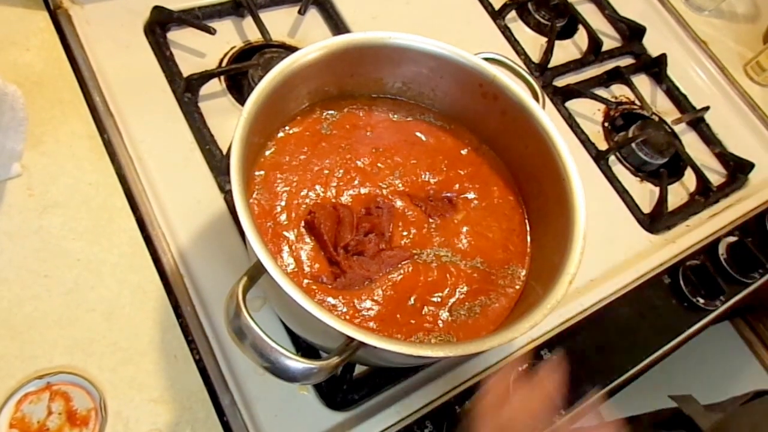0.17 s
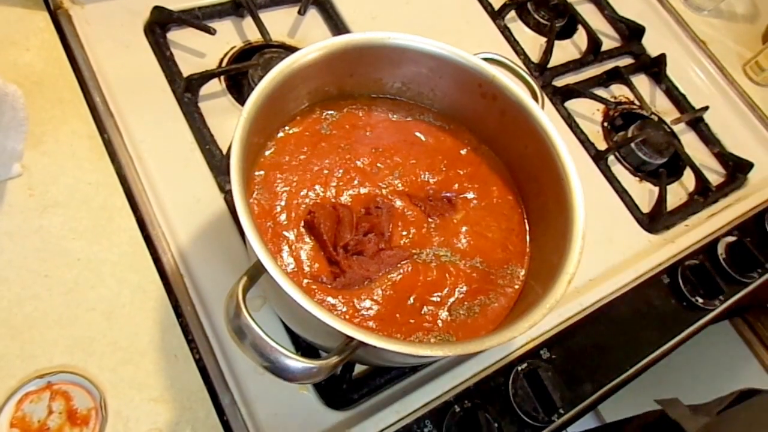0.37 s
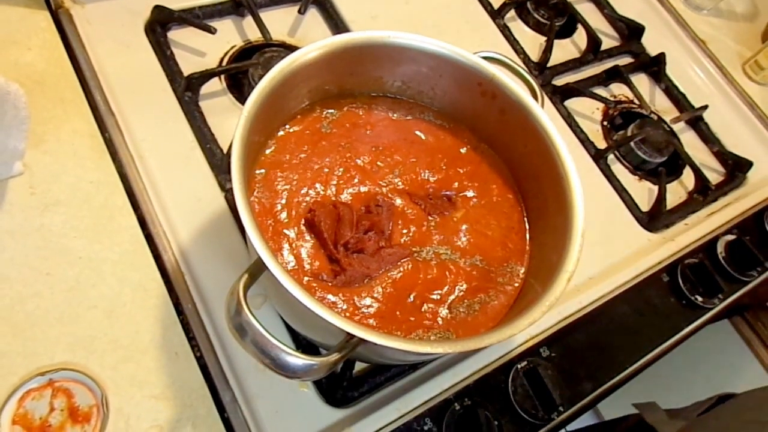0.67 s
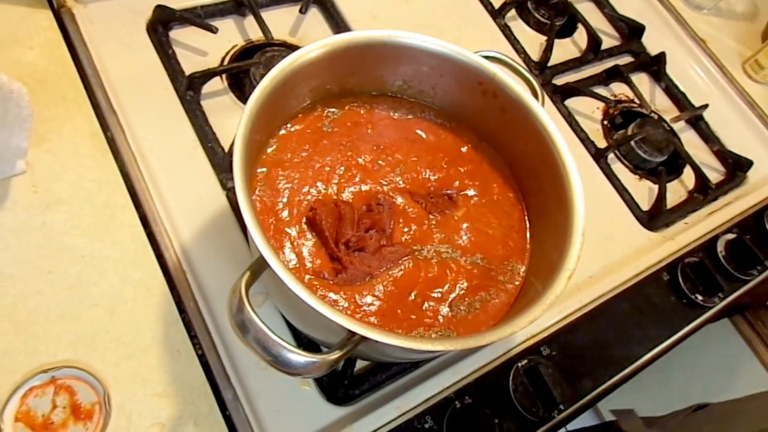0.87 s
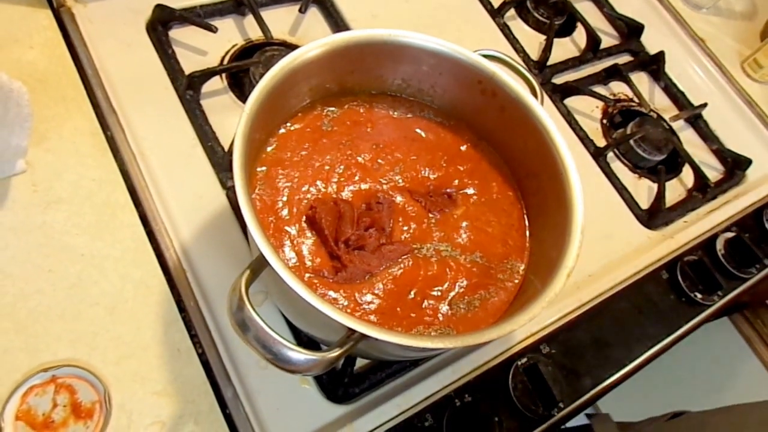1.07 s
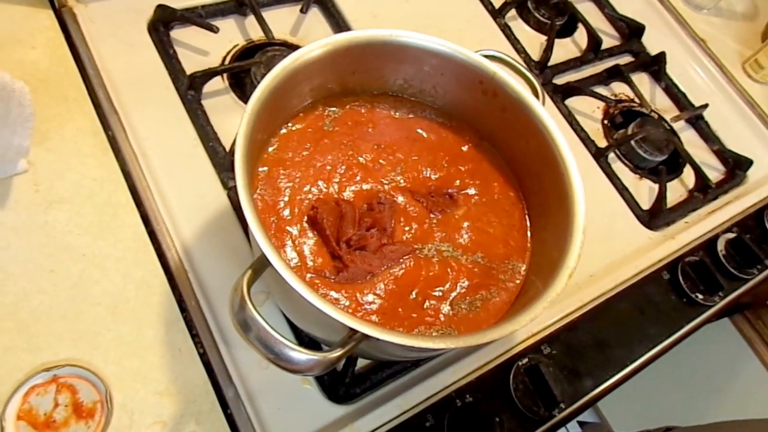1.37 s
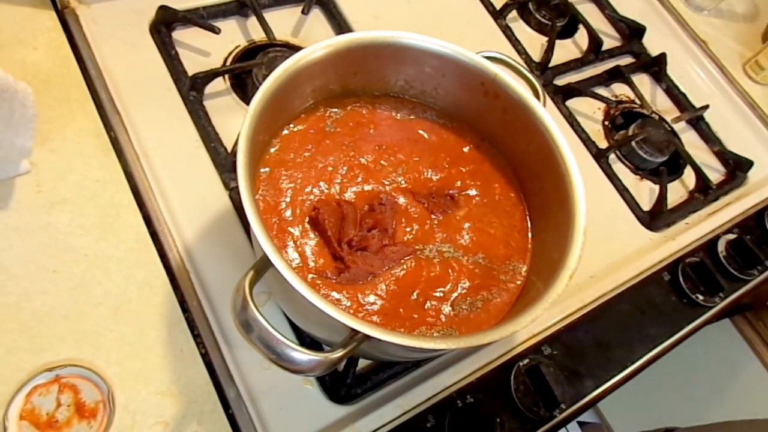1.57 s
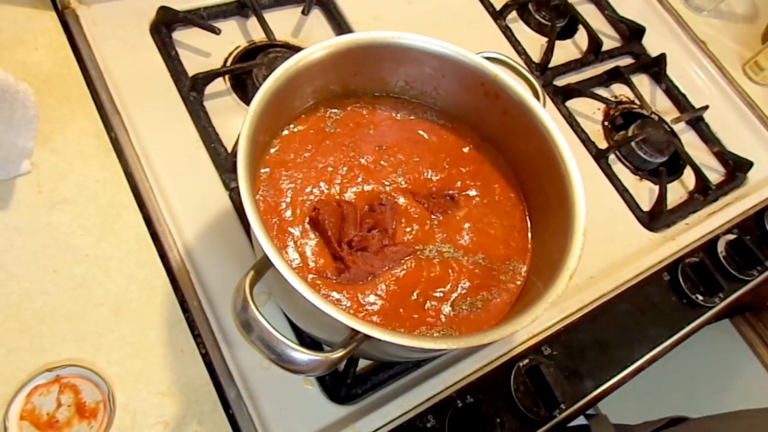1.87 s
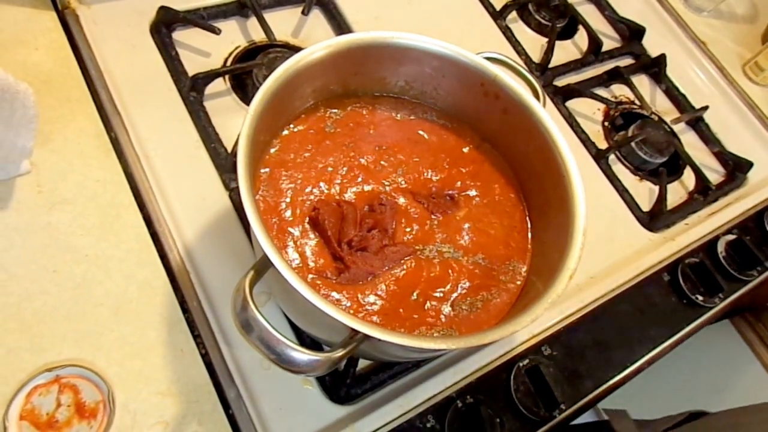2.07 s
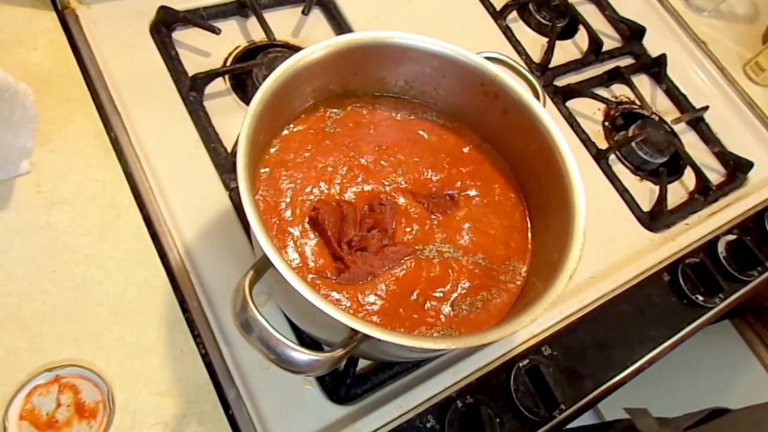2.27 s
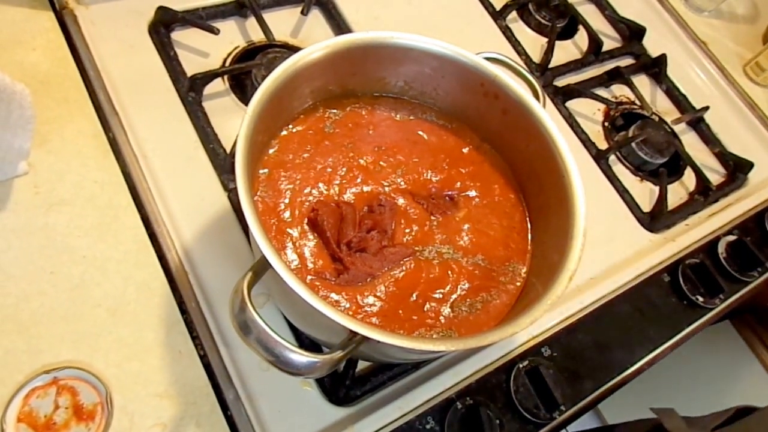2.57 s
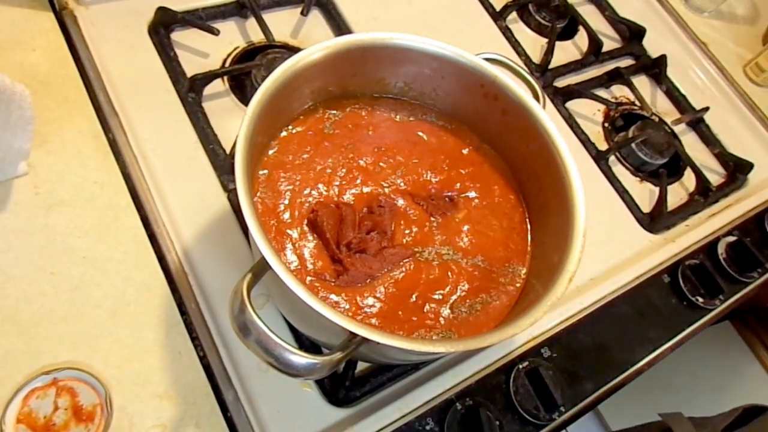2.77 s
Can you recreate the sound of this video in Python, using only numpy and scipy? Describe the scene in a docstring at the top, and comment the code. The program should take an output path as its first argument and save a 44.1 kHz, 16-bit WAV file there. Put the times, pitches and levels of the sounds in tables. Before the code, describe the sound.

A metal knife clinks and scrapes inside a tin can, with one hard clank.

```python
"""A steel knife works the last paste out of a tin can over a stove. First the hollow can goes clonk.
Then the blade clinks and chatters on the thin wall, knocks dully where paste cushions it and slides
lightly between blows. Halfway through, it scrapes harder along the inside. Near the end comes one hard
clank with a rebound; a pot's low notes hum on under two last soft knocks. All along, a small kitchen
echoes and hisses faintly. The sound sits in the centre."""
import sys
import numpy as np
from scipy import signal
from scipy.fft import rfft, irfft
from scipy.io import wavfile

SR = 44100
rng = np.random.default_rng(int(sys.argv[2]) if len(sys.argv) > 2 else 0)


def master_out(mix):
    """Clip the mix to full scale and print it as 16-bit PCM to the path in sys.argv[1]."""
    frames = np.transpose(np.atleast_2d(mix))
    ceiling = np.clip(frames, -1, 1)
    pcm = np.round(ceiling * 32767).astype(np.int16)
    wavfile.write(sys.argv[1], SR, pcm)


N = 130095
T = np.arange(SR * 4 // 5) / SR  # seconds since a blow began
ROOM_DB, RING_ROOM_DB = -10.5, -17  # echo level of noisy sounds, and of ringing metal


def clinks(wall_db=10, snap_db=3, can_db=-5.5, stove_delay_s=0.0072, stove_db=-7.5):
    """The blade snaps and chatters on the tin; wall, blade, can and struck spot all ring."""
    # blows on the wall: start_s, contact_s, low_db, mid_db, high_db, top_db, blade_db, spot_hz, spot_db
    blows = [(0.22, 0.0037, -33, -41.5, -32.5, -57, -57, 542, -36),
             (.270, 0.0055, -25.5, -27.5, -16, -30, -25, 6526, -28.5),
             (0.3228, 0.0057, -27, -27, -23.5, -33, -34.5, 4080, -32),
             (0.703, 0.0074, -29, -27, -19, -25.5, -50, 1260, -52),
             (0.715, 0.0051, -36, -38, -36, -26.5, -60, 3820, -24),
             (0.923, 0.013, -55, -43.5, -38, -47, -53, 625, -43),
             (.943, 0.025, -38, -38.5, -37, -36, -42.5, 3700, -40.5),
             (1.096, 0.022, -24.5, -22, -22.5, -37, -25.5, 2874, -20),
             (1.1085, 0.0068, -20.5, -35, -17.5, -18, -21.5, 778, -28),
             (1.1814, 0.0083, -30, -33.5, -30.5, -26.5, -45, 764, -29.5),
             (1.451, 0.014, -34, -31.5, -30, -29, -39, 3825, -35),
             (1.72, 0.015, -56, -39, -39, -43, -48, 3230, -63),
             (1.946, 0.0082, -34.5, -32.5, -25, -32.5, -59, 2540, -25.5),
             (1.965, 0.0057, -37.5, -38.5, -48, -62, -56, 2410, -33.5),
             (2.172, .011, -27, -23, -18.5, -26.5, -25.5, 742, -23.5),
             (2.236, 0.0064, -25, -24, -10, -36, -30, 2317, -19.5),
             (2.256, 0.019, -30.5, -28.5, -27.5, -27.5, -47, 2400, -24),
             (2.283, 0.03, -41, -33, -29.5, -68, -52, 3000, -28),
             (2.372, 0.015, -32.5, -31, -27, -29.5, -35, 720, -30.5),
             (2.4241, 0.011, -24.5, -32, -25.5, -61, -48, 2970, -29),
             (2.487, .009, -33, -31, -31, -25.5, -33, 526, -30)]
    # middles of the low, mid, high and top bands: pitch_hz
    bands_hz = [620, 1500, 3700, 10500]
    # tone colours of the thin wall and of the bright first snap: pitch_hz, level_db
    tin_colour = [(30, -65), (110, -28), (220, -13.5), (380, -6), (650, -2), (1000, -5), (1500, 0.5),
                  (3000, -8.5), (4700, -7.5), (5600, -11.5), (7600, -14.5), (11500, -18), (15000, -33)]
    snap_colour = [(200, -8), (3000, -23), (6000, -9.5), (11500, 4), (15000, 7)]
    # ringing notes of the blade and of the can: pitch_hz, level_db, fade_s
    blade_notes = [(2876, -3.5, 0.18), (3584, -9.5, .085), (4260, -9, 0.087), (4610, -3, .11),
                   (4690, -3, 0.11), (6610, -10, 0.11), (8620, -18, 0.14), (8920, -17, .1),
                   (10870, -9.5, 0.087), (11640, -6, 0.04), (13200, -11, 0.049), (13300, -10, 0.13),
                   (14790, -23, 0.062)]
    can_notes = [(548, -5.5, 0.18), (742.3, -0.5, 0.11), (1350, -11, 0.12), (1721, -4, 0.093),
                 (1920, -11.5, 0.071), (2463, -11, 0.13), (3030, -4, 0.088), (3210, -2.5, 0.054),
                 (3915, -2, 0.03), (3915, -4.5, 0.11), (4700, -12.5, 0.031), (6140, -7, 0.035),
                 (8910, -7.5, 0.063), (11380, -12.5, 0.13)]
    out = np.zeros(N)
    for start_s, contact_s, low_db, mid_db, high_db, top_db, blade_db, spot_hz, spot_db in blows:
        bands = list(zip(bands_hz, (low_db, mid_db, high_db, top_db)))
        peaks = wall_peaks()
        taps = chatter(contact_s, fade_s=0.074)
        wall = coloured(taps, lambda hz: along(tin_colour, hz) + along(bands, hz) + peaks(hz) + wall_db)
        snap = amp(top_db + snap_db) * coloured(chatter(0, fade_s=0.042), shape(snap_colour))
        tones = amp(blade_db) * ring(blade_notes, waver=0.81)
        tones += amp(mid_db + can_db) * ring(can_notes, waver=0.48)
        tones += ring([(spot_hz, spot_db, 0.093)], waver=1.37)
        room = echo(amp(ROOM_DB) * wall + amp(RING_ROOM_DB) * tones)
        add(out, start_s, snap + wall + tones + room)
        # the stove top throws each clink back
        add(out, start_s + stove_delay_s, amp(stove_db) * (snap + kitchen(wall)))
    return out


def clank():
    """A heavy metal blow and its rebound, each with a rough ring that dies quickly."""
    # the two blows: start_s, contact_s, body_db, ring_db
    blows = [(2.593, 0.0078, -14, -25), (2.639, 0.019, -30, -71)]
    # tone colour of the crash: pitch_hz, level_db
    body_colour = [(30, -32), (110, -20.5), (170, -23), (250, -9), (350, -5.5), (700, 2), (1300, 0),
                   (1900, 0.5), (2600, -10), (3300, -7.5), (3950, -20), (4500, -4), (5400, -25.5),
                   (7300, -33), (15000, -36)]
    # high notes of the metal: pitch_hz, level_db, fade_s
    notes = [(4500, -10, .14), (4656, 3, 0.07), (4834, -17, .13), (5950, 2.5, 0.095), (6514, -18, .14),
             (8064, -15, 0.19), (8796, -17, 0.12), (11500, -17, 0.1), (14200, -28, .1)]
    out = np.zeros(N)
    for start_s, contact_s, body_db, ring_db in blows:
        peaks, colour = wall_peaks(), shape(body_colour)
        body = coloured(chatter(contact_s, fade_s=0.12), lambda hz: colour(hz) + 0.5 * peaks(hz))
        tones = amp(ring_db) * ring(notes, waver=1.26)
        add(out, start_s, kitchen(amp(body_db) * body) + tones + amp(RING_ROOM_DB) * echo(tones))
    return out


def clonk(start_s=0.2388, level_db=-10.5, rise_s=0.0021):
    """One clean, short blow into the hollow of the can: all its notes start together."""
    # notes of the hollow can: pitch_hz, level_db, fade_s
    notes = [(714, -28, 0.016), (830, -3, 0.05), (886.5, 4.5, 0.066), (955, -6, 0.12), (1296, -4, 0.1),
             (1394, -6, 0.12), (1990, -9, .04), (2510, -9, 0.018)]
    tones = sum(amp(db) * fade(T, fade_s) * np.sin(2 * np.pi * hz * T) for hz, db, fade_s in notes)
    out = np.zeros(N)
    add(out, start_s, amp(level_db) * tones * (1 - np.exp(-T / rise_s)))
    return out


def knocks(contact_s=0.003, fade_s=0.072, width_octaves=0.49):
    """Paste cushions these blows, leaving a hollow thud with a brighter edge."""
    # cushioned blows: start_s, level_db, pitch_hz, edge_db (compared with the thud)
    blows = [(.2395, -16, 938, 0), (0.253, -39, 1220, -16), (.265, -23, 1130, -13), (.394, -27, 910, -10),
             (.4215, -32.5, 1020, -22), (.435, -33, 880, -0.5), (.4545, -23, 903, -8.5),
             (.565, -44.5, 600, 0), (1.033, -32.5, 610, -43), (1.074, -34, 495, -16),
             (1.203, -33, 530, -13), (1.395, -48.5, 368, -11), (1.514, -36, 630, -27),
             (1.623, -32.5, 606, -11), (1.863, -27.5, 670, -10), (1.879, -39.5, 427, -25),
             (2.109, -55, 720, 11), (2.820, -35, 750, -27), (2.882, -41.5, 670, -10)]
    # tone colours of the thud's bass and of the edge: pitch_hz, level_db
    bass_colour = [(60, -10), (170, 9), (300, -4), (450, 0.5)]
    edge_colour = [(50, -64), (300, -26.5), (900, 3.5), (1400, 10), (1700, 5.5), (2400, 8.5), (2800, -2.5),
                   (3800, -6.5), (5000, -11), (6500, -26), (15000, -30)]
    out = np.zeros(N)
    for start_s, level_db, pitch_hz, edge_db in blows:
        def hollow(hz):
            """One broad peak around the knock's pitch, in dB."""
            distance = np.log2((hz + 1) / pitch_hz) / width_octaves / 2
            return -20 * np.log10(1 + distance ** 2) * 2.73 + along(bass_colour, hz)
        thud = coloured(chatter(contact_s, fade_s), same_power(hollow))
        edge = coloured(chatter(contact_s, fade_s), shape(edge_colour))
        add(out, start_s, amp(level_db) * kitchen(thud + amp(edge_db) * edge))
    return out


def scrape(slips_per_s=900, spread_db=4):
    """Tiny uneven slips of the blade make a hollow rub, a rasp on the wall and a thin squeak."""
    # loudness of the scraping over time: time_s, rub_db, rasp_db, squeak_db
    loudness = [(.1, -64, -72, -82), (.84, -86, -68, -74), (1.02, -56, -66, -79), (1.25, -54, -62, -56),
                (1.40, -63.5, -62, -75), (1.50, -41.5, -46.5, -47.5), (1.56, -44, -50, -81),
                (1.61, -48, -50.5, -56), (1.636, -45, -42.5, -46), (1.70, -37.5, -42, -48.5),
                (1.745, -52.5, -52, -57), (1.81, -42.5, -52, -46.5), (1.846, -50, -49, -59),
                (1.902, -33.5, -52, -47), (1.95, -79, -46, -57), (2.14, -54.5, -68, -66),
                (2.45, -62, -48, -47.5), (2.95, -50, -69, -89)]
    # tone colours of the can's hollow and of its wall: pitch_hz, level_db
    rub_colour = [(100, -41.5), (280, -17.5), (400, -5), (540, -5), (610, -5.5), (690, 5), (790, -6),
                  (950, -19.5), (1400, -18.5), (4000, -86)]
    rasp_colour = [(200, -13), (1000, -0.5), (1600, 7.5), (2200, 2.5), (2700, -14), (4800, -10.5),
                   (6500, -20.5), (15000, -34)]
    # narrow peaks of the squeak: pitch_hz, width_hz, level_db
    squeaks = [(2857, 190, -1.5), (3252, 110, -1.5), (4900, 230, -14)]

    def squeak(hz):
        """The peaks added together, in dB."""
        peaks = (amp(db) / (1 + (2 * (hz - pitch) / width) ** 2) for pitch, width, db in squeaks)
        return 20 * np.log10(sum(peaks))
    times_s, *levels = np.transpose(loudness)
    out = np.zeros(N)
    for level_db, colour in zip(levels, (shape(rub_colour), shape(rasp_colour), same_power(squeak))):
        slips = (rng.random(N) < slips_per_s / SR) * rng.choice([-1, 1], N)
        slips = slips * amp(spread_db * rng.standard_normal(N))
        slips /= np.sqrt(np.mean(slips ** 2) + 1e-20)
        out += amp(np.interp(np.arange(N) / SR, times_s, level_db)) * coloured(slips, colour)
    return kitchen(out)


def hums():
    """Low metal notes hum on: the can after some harder blows, a pot after the last clank."""
    # lingering low notes: start_s, pitch_hz, level_db, fade_s
    notes = [(.239, 835, -32.5, 0.62), (0.24, 1400, -30.5, 0.3), (0.238, 1007, -46, 0.33),
             (0.7009, 1324, -38.5, 0.31), (1.946, 816, -44, 0.44), (2.592, 1321, -26, 0.36),
             (2.593, 1045, -32, 0.46), (2.593, 753, -37, 0.74)]
    out = np.zeros(N)
    for start_s, *note in notes:
        add(out, start_s, ring([note], waver=0.27))
    return out


def slides():
    """The blade slides lightly over the metal in soft swells of noise."""
    # strokes: middle_s, length_s, level_db, pitch_hz, fall_db (per octave away from the pitch)
    strokes = [(0.185, .025, -56.5, 4400, 5), (0.438, 0.016, -51.5, 10000, 10),
               (0.422, 0.068, -38, 950, 27), (0.622, 0.061, -60, 12500, 16),
               (0.896, 0.056, -54.5, 3780, 13), (0.906, 0.037, -58, 11000, 14),
               (1.632, .05, -57.5, 9000, 6), (1.88, .06, -58.5, 9000, 4)]
    out, t = np.zeros(N), np.arange(N) / SR
    for middle_s, length_s, level_db, pitch_hz, fall_db in strokes:
        colour = same_power(lambda hz: -fall_db * np.abs(np.log2((hz + 1) / pitch_hz)))
        swell = np.exp(-2 * ((t - middle_s) / length_s) ** 2)
        out += amp(level_db) * swell * coloured(rng.standard_normal(N), colour)
    return out


def kitchen(sound):
    """A sound together with its echo."""
    return sound + amp(ROOM_DB) * echo(sound)


def echo(sound, rise_s=0.0052):
    """The room answers with a noisy tail whose high pitches die first."""
    # how long the kitchen rings: pitch_hz, fade_s
    room_fades = [(150, 0.86), (700, 0.77), (2000, 0.39), (5000, 0.37), (12000, 0.3)]
    hz, t, noise = signal.stft(rng.standard_normal(SR * 3 // 4), SR, nperseg=256)
    tail = signal.istft(noise * fade(t, along(room_fades, hz)[:, None]), SR, nperseg=256)[1]
    tail *= 1 - np.exp(-T[:len(tail)] / rise_s)
    return signal.fftconvolve(sound, tail / np.linalg.norm(tail))[:len(sound)]


def hiss():
    """The steady background noise of stove and kitchen."""
    # tone colour of the hiss: pitch_hz, level_db
    hiss_colour = [(25, -11.5), (60, -6), (130, -4), (230, -3), (700, -8), (1150, 5), (1700, -7),
                   (3700, -6.5), (5600, -11), (14400, -12), (16000, -14.5)]
    return coloured(rng.standard_normal(N), shape(hiss_colour))


def chatter(contact_s, fade_s, first_hit=4.2):
    """One hit, then a rush of tiny taps that last while the blade touches and then die away."""
    taps = rng.choice([-1, 1], len(T)) * rng.uniform(0.38, 1.194, len(T))
    taps *= fade(np.maximum(T - contact_s, 0), fade_s)
    taps[0] = first_hit
    return taps


def ring(notes, waver, rise_s=0.0006):
    """Struck metal rings with fading notes, each a little unsteady and never twice alike."""
    out = np.zeros(len(T))
    steps_s = T[::256]
    for hz, db, fade_s in notes:
        t = T[T < fade_s]
        drift = np.interp(t, steps_s, np.cumsum(rng.standard_normal(len(steps_s))))
        loudness = amp(db + rng.normal(0, 1)) * fade(t, fade_s)
        out[:len(t)] += loudness * np.sin(2 * np.pi * (hz * t + rng.random()) + waver * drift)
    return np.sqrt(2) * out * (1 - np.exp(-T / rise_s))


def wall_peaks(depth_db=3, spacing_hz=85.3):
    """A tone colour of random peaks and dips: each spot on the wall favours other pitches."""
    heights = rng.standard_normal(2048)
    return lambda hz: depth_db * np.clip(np.interp(hz / spacing_hz, np.arange(2048), heights), -2, 2)


def coloured(sound, colour, size=4096):
    """Filter a sound by a tone colour: a function that gives a level in dB for each pitch."""
    gains = amp(colour(np.fft.rfftfreq(2 * size, 1 / SR)))
    cepstrum = irfft(np.log(gains + 1e-6))
    # fold onto the first half, so nothing rings before the blow
    cepstrum[1:size] *= 2
    cepstrum[size + 1:] = 0
    response = irfft(np.exp(rfft(cepstrum)))[:size]
    return signal.fftconvolve(sound, response)[:len(sound)]


def same_power(colour):
    """Shift a tone colour so that white noise keeps its power through it."""
    pitches_hz = np.fft.rfftfreq(4096, 1 / SR)
    offset_db = 10 * np.log10(np.mean(amp(colour(pitches_hz)) ** 2))
    return lambda hz: colour(hz) - offset_db


def shape(points):
    """Turn (pitch_hz, level_db) points into a tone colour that keeps the power."""
    return same_power(lambda hz: along(points, hz))


def along(points, hz):
    """Read between (pitch_hz, value) points, with octaves evenly spaced."""
    pitches_hz, values = np.transpose(points)
    return np.interp(np.log(hz + 1), np.log(pitches_hz + 1), values)


def fade(t, fade_s):
    """Die away by 60 dB every fade_s seconds."""
    return np.exp(-np.log(1000) * t / fade_s)


def amp(db):
    """Turn decibels into a multiplier."""
    return 10 ** (np.asarray(db) / 20)


def add(track, start_s, sound):
    """Mix a sound into the track at start_s."""
    part = track[round(start_s * SR):][:len(sound)]
    part += sound[:len(part)]


def scene(hiss_db=-55.5, width_tail_db=-48, width_noise_db=-75.5):
    """All sits in the centre; a very faint added noise, partly following the blows, widens it a little."""
    metal = clinks() + clonk() + knocks() + clank() + hums() + scrape() + slides()
    centre = metal + amp(hiss_db) * hiss()
    width = amp(width_tail_db) * echo(metal) + amp(width_noise_db) * hiss()
    return np.array([centre + width, centre - width])


def record(dry, top_hz=14950):
    """A steep filter cuts away the very highest treble."""
    return signal.sosfilt(signal.ellip(12, 0.1, 90, top_hz, fs=SR, output="sos"), dry)


dry = scene()
out = record(dry)
master_out(out)
```